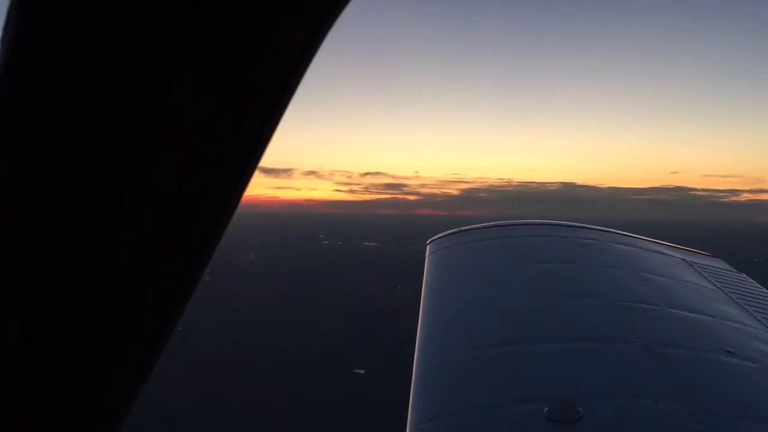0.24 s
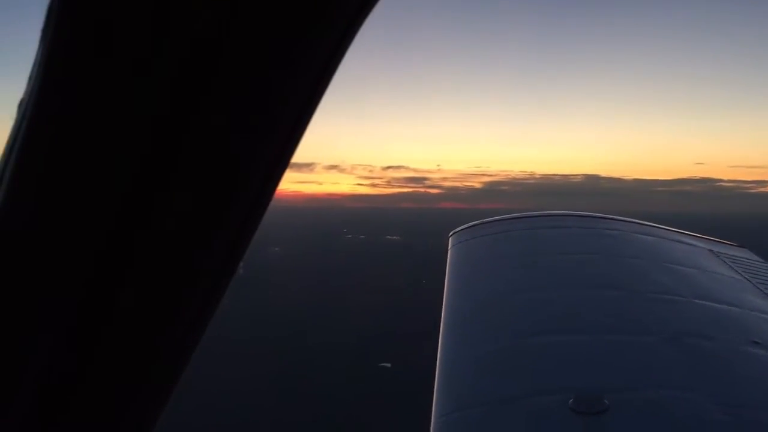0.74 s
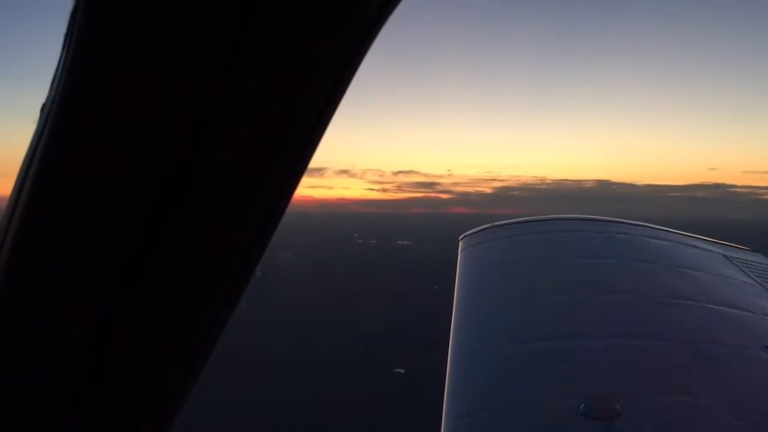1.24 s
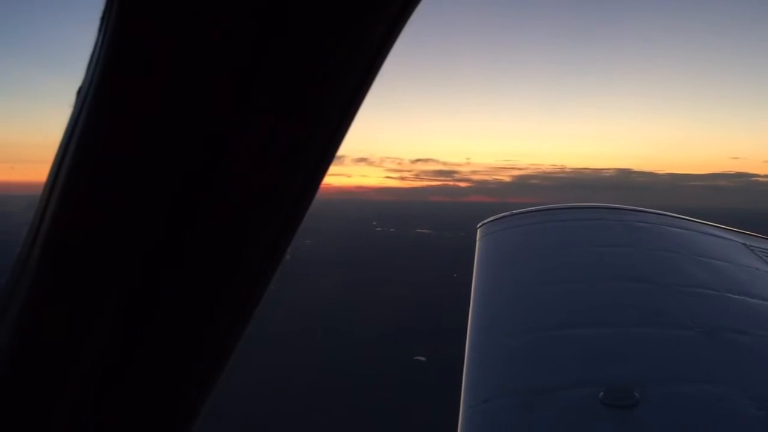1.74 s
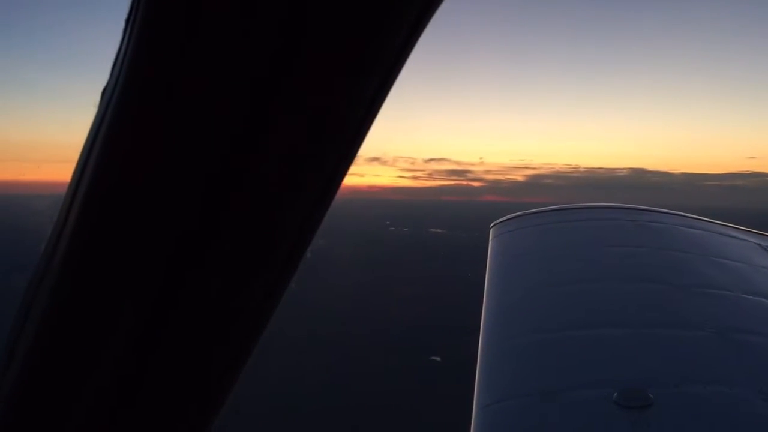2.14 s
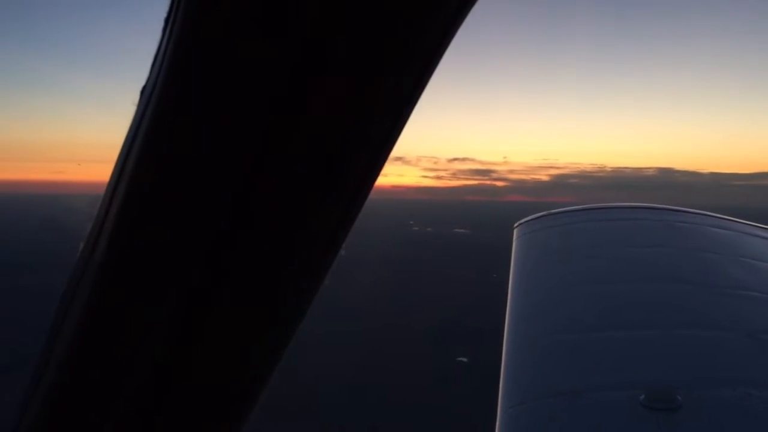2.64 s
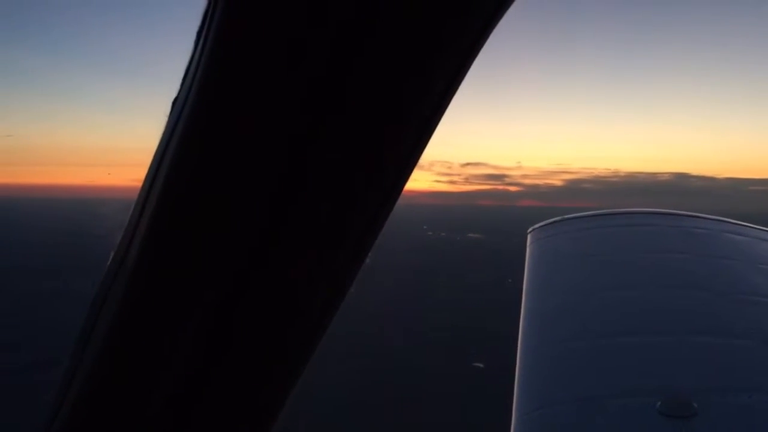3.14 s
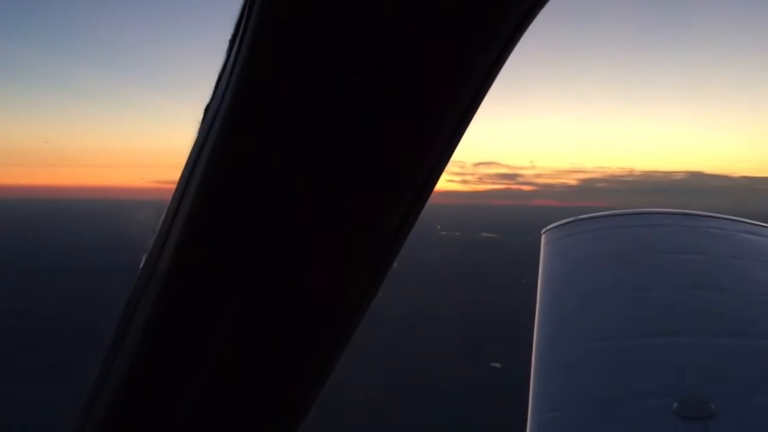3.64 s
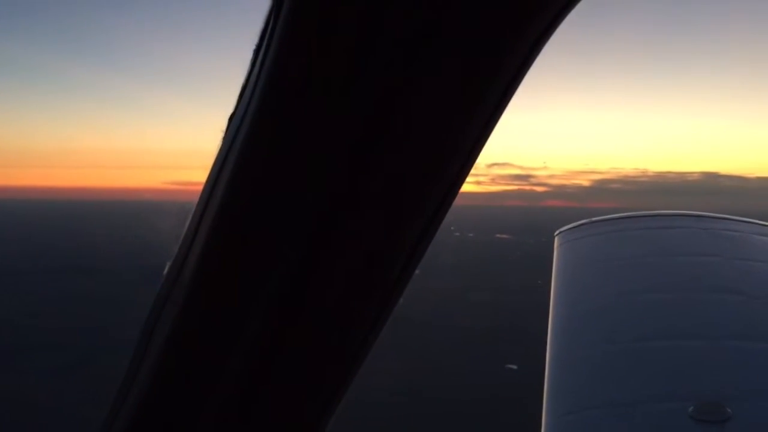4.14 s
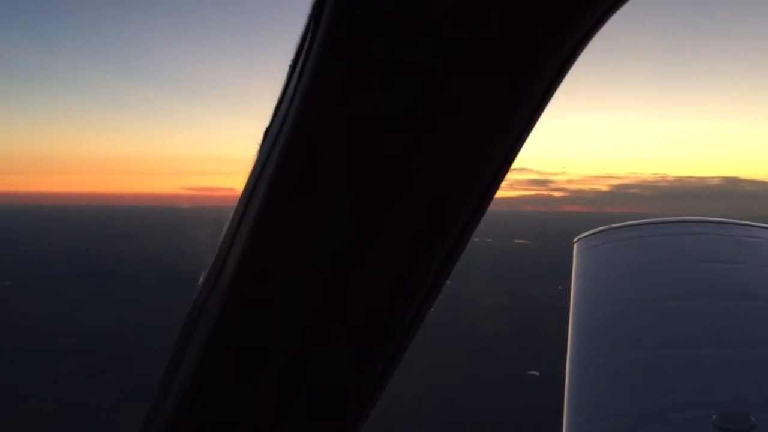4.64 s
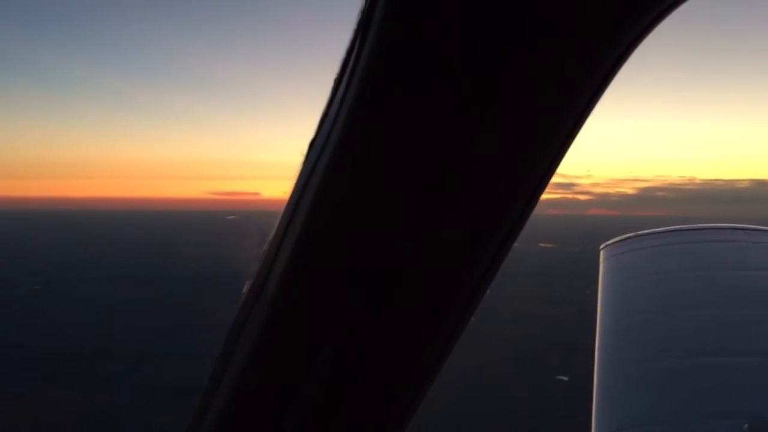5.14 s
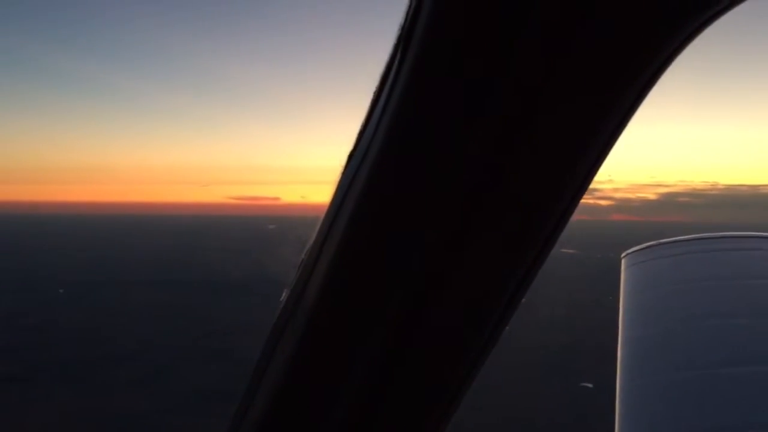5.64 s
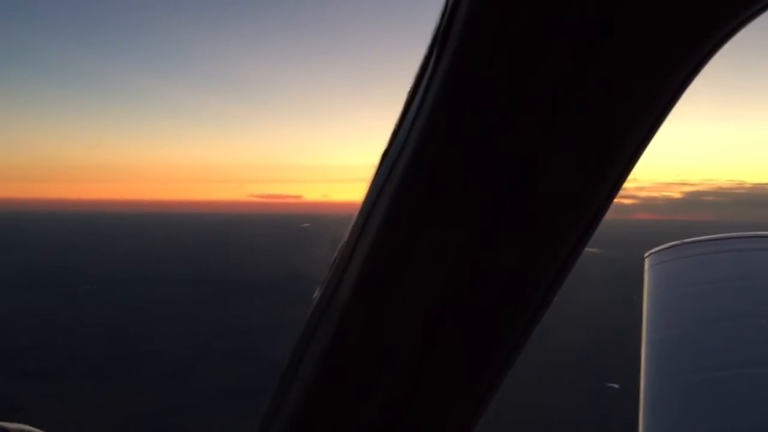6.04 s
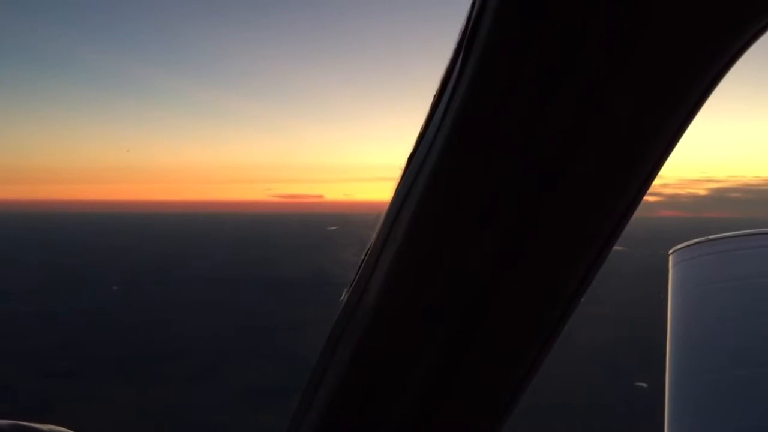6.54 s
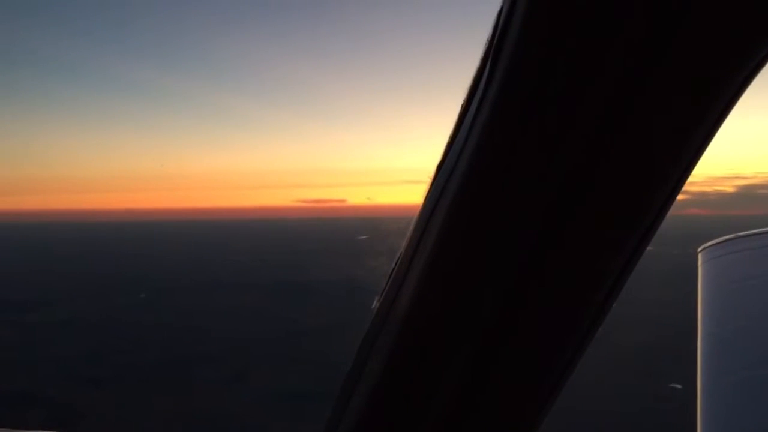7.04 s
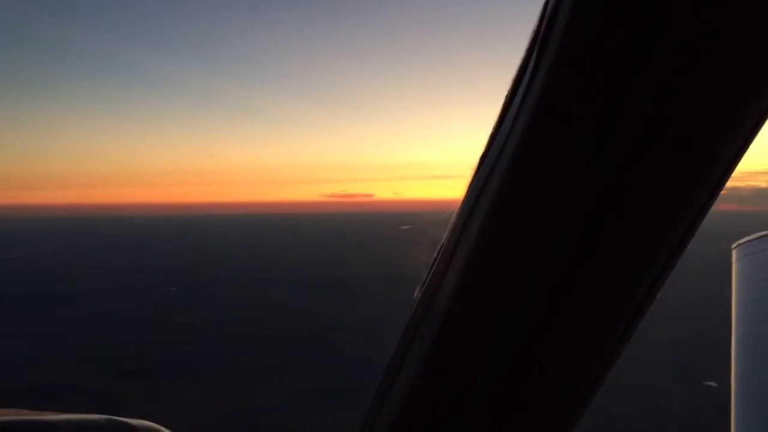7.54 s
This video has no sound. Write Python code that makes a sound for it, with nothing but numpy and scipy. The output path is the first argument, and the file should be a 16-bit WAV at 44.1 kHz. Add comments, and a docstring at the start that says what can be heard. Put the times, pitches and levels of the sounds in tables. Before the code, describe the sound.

Inside a small single-engine airplane in level flight, a deep steady engine and propeller drone hums loudly, with low cabin rumble and rushing air.

```python
"""A deep engine and propeller drone fills the cabin of a single-engine light airplane in level cruise.
It is built from sine tones at multiples of the crank speed, and a strong separate hum beats against them.
Shaped noise makes the rumble and boom of the cabin, a draught with a few puffs, and the rush of the slipstream.
The listener slowly turns from the wing towards the nose, which shifts the rush and some engine tones."""
import sys
import numpy as np
from scipy import signal
from scipy.fft import rfft, irfft
from scipy.io import wavfile

SR = 44100
rng = np.random.default_rng(int(sys.argv[2]) if len(sys.argv) > 2 else 0)


def digitize_waveform(pressure):
    """Quantize a signal to 16-bit integers and store it at the path in sys.argv[1].

    Rows of a 2-D input are taken as channels; values are limited to [-1, 1].
    """
    field = np.atleast_2d(pressure).T
    bounded = np.clip(field, -1, 1)
    quanta = np.round(bounded * 32767).astype(np.int16)
    wavfile.write(sys.argv[1], SR, quanta)


N = 343980   # length in samples, 7.8 s
TIME_S = np.arange(N) / SR


def from_db(db):
    """Turn decibels into a gain to multiply by."""
    return 10 ** (np.asarray(db) / 20)


def rms_one(x):
    """Scale to an average strength (rms) of 1."""
    return x / np.sqrt(np.mean(x ** 2) + 1e-20)


def in_time(rows):
    """Join the points of a table by straight lines: one value per sample for each column after the time."""
    point_s, *columns = np.transpose(rows)
    return [np.interp(TIME_S, point_s, column) for column in columns]


def drift(rate_hz):
    """Smooth random wandering of rms about 1, changing about `rate_hz` times a second."""
    step = 100            # samples between the random values
    settle = 1000         # first values, dropped while the smoothing filter settles
    pole = np.exp(-2 * np.pi * rate_hz * step / SR)
    white = rng.standard_normal(N // step + settle + 2)
    slow = signal.lfilter([1], [1, -2 * pole, pole * pole], white)[settle:]
    return np.interp(np.arange(N) / step, np.arange(len(slow)), rms_one(slow))


def bell(middle_s, length_s):
    """A smooth rise and fall of height 1; `length_s` either side of the middle it is down to 0.14."""
    return np.exp(-2 * ((TIME_S - middle_s) / length_s) ** 2)


def swells_db(rows):
    """Level change in dB from brief swells and dips."""
    return sum(change_db * bell(middle_s, length_s) for middle_s, change_db, length_s in rows)


def air_noise(colour, ripple_db=1.23):
    """Turbulent air: random noise given a colour, dying away 20 dB per octave beyond its ends; rms 1."""
    point_hz, point_db = np.transpose(colour)
    grid_hz = np.maximum(np.arange(N // 2 + 1) * SR / N, 1)
    octaves_outside = np.abs(np.log2(grid_hz / np.clip(grid_hz, point_hz[0], point_hz[-1])))
    level_db = np.interp(np.log(grid_hz), np.log(point_hz), point_db) - 20 * octaves_outside
    # echoes from the close walls comb the midrange; the upholstery soaks up the higher ones
    echo_delays_s = rng.uniform(0.00199, .009, size=6)
    combs = sum(np.cos(2 * np.pi * grid_hz * delay_s) for delay_s in echo_delays_s)
    comb_depth = np.interp(grid_hz, [0, 1300, 3500, 7000], [0, 1, 1, .4])
    level_db = level_db + ripple_db * comb_depth * rms_one(combs)
    spectrum = rfft(rng.standard_normal(N)) * from_db(level_db)
    return rms_one(irfft(spectrum, N))


def buffeted(colour, swing_db, rate_hz):
    """Air noise whose level swings at random, `rate_hz` times a second; rms 1."""
    return rms_one(from_db(swing_db * drift(rate_hz)) * air_noise(colour))


# colours of the rush past the windows, towards the wing and towards the nose, and of the hiss
# columns of all three: pitch_hz, relative_level_db (per Hz)
RUSH_WING_COLOUR = [(400, -21), (800, -5), (1030, -1), (1170, 4.5), (1450, -0.5), (1600, 0.5), (1720, 1),
                    (1870, -5.5), (2080, -3.5), (2400, -1.5), (2540, 1.5), (2800, -6), (2980, -9),
                    (4000, -38)]
RUSH_NOSE_COLOUR = [(400, -11.5), (800, -7), (1080, -4), (1280, -0.5), (1500, 1.5), (1650, -2),
                    (1830, -0.5), (2000, -5.5), (2150, -6), (2400, -4.5), (2580, -3), (2800, -5.5),
                    (2980, -15.5), (4000, -38)]
HISS_COLOUR = [(1500, -18.5), (3100, 0), (3800, 1), (4500, -1), (4920, -4), (5300, -0.6), (6800, -4),
               (8200, -8), (9700, -10), (10500, -14.5), (11100, -11.5), (13900, -12.5), (14500, -8.5),
               (15300, -15)]


def slipstream(turns, heading, wing_db=-33.0, nose_db=-34.5, hiss_db=-41.5, chop=0.036):
    """Steady rush and hiss of outside air, chopped a little by each pass of the two propeller blades."""
    blade_angle = 2 * 2 * np.pi * turns   # two blade passes in each turn
    blades = 1 + chop * (np.cos(blade_angle) + np.cos(2 * blade_angle))
    # the rush is loudest towards the wing, and the windows colour it differently in each direction
    wing_rush = np.sqrt(1 - heading) * from_db(wing_db) * air_noise(RUSH_WING_COLOUR)
    nose_rush = np.sqrt(heading) * from_db(nose_db) * air_noise(RUSH_NOSE_COLOUR)
    hiss = from_db(hiss_db) * air_noise(HISS_COLOUR)
    return blades * (wing_rush + nose_rush + hiss)


# strength of the draught before its trim; columns: start_s, level_db
GUSTS = [(0, -36), (1.3, -34.5), (1.8, -31), (2.25, -34), (2.9, -33.5), (3.6, -35.5), (4.7, -33.5),
         (5.15, -29.5), (5.8, -37), (6.6, -36), (7.1, -31.5), (7.8, -34.5)]
# colour of the draught; columns: pitch_hz, relative_level_db (per Hz)
DRAUGHT_COLOUR = [(200, -22), (320, -2.5), (440, -3.5), (490, -2.5), (540, 1.5), (620, 1.5), (720, -3),
                  (850, -7.5), (1050, -11), (1400, -15), (3000, -30)]


def draught(trim_db=-1.0, eddy_db=1.7, eddy_hz=11):
    """A draught in the cabin: noise that follows the gusts and wavers quickly at random."""
    gust_db, = in_time(GUSTS)
    level_db = gust_db + trim_db + eddy_db * drift(eddy_hz)
    return from_db(level_db) * air_noise(DRAUGHT_COLOUR)


# short puffs of the draught, level before their trim; columns: middle_s, level_db, length_s
PUFF_TIMES = [(1.732, -30.5, 0.018), (2.04, -31.5, 0.016), (2.872, -35, 0.034), (3.12, -32, .022),
              (3.228, -32.5, 0.028), (4.85, -33, 0.017), (4.956, -31, 0.025), (5.065, -33.5, 0.034),
              (5.196, -33.5, 0.052), (5.31, -33, 0.037)]
# colour of a puff; columns: pitch_hz, relative_level_db (per Hz)
PUFF_COLOUR = [(150, -5), (250, -1), (430, 6), (600, -3), (800, 1), (1050, -1), (1400, -21), (2500, -41)]


def puffs(trim_db=3.0):
    """Eddies of the draught brush past, each a soft swell of dull noise."""
    strength = sum(from_db(level_db + trim_db) * bell(middle_s, length_s)
                   for middle_s, level_db, length_s in PUFF_TIMES)
    return strength * air_noise(PUFF_COLOUR)


# slow changes in the buffeting, boom before its trim; columns: start_s, rumble_db, boom_db
BUFFET = [(0, -32, -28.8), (1.2, -34.5, -28), (1.75, -28.5, -26), (3.05, -33, -28.5), (3.6, -27.5, -28),
          (4.3, -27, -25.5), (5.8, -28.5, -28.5), (7.0, -32.5, -29.5), (7.8, -29, -30)]
# all the bass of the airframe sinks once, and the hum partly, during the strongest gust
# columns: middle_s, change_db, length_s
LULL = [(5.1, -6.5, .19)]
# colours of the deep rumble, the thrum and the boom; columns: pitch_hz, relative_level_db (per Hz)
RUMBLE_COLOUR = [(15, -25), (28, -21), (36, -21), (48, -4), (57, -0.5), (70, -2), (90, -14), (140, -44)]
THRUM_COLOUR = [(45, -36), (70, -14), (90, -4.5), (112, -4.5), (135, -9.5), (165, -10), (220, -25),
                (400, -38)]
BOOM_COLOUR = [(100, -37), (150, 2), (175, -0.5), (215, -1.5), (260, -6), (300, -7.5), (335, -20),
               (450, -30), (900, -48)]


def airframe(thrum_db=-24.5, boom_trim_db=-0.56):
    """Turbulence shakes the skin panels and the air they enclose, in three bands of low, uneven noise."""
    rumble_db, boom_db = in_time(BUFFET)
    rumble = from_db(rumble_db) * buffeted(RUMBLE_COLOUR, swing_db=2.0, rate_hz=5.0)
    thrum = from_db(thrum_db) * buffeted(THRUM_COLOUR, swing_db=2.0, rate_hz=5.3)
    boom = from_db(boom_db + boom_trim_db) * buffeted(BOOM_COLOUR, swing_db=1.2, rate_hz=5.2)
    return from_db(swells_db(LULL)) * (rumble + thrum + boom)


# pitch of the hum; columns: start_s, pitch_hz
HUM_PITCH = [(0, 135.0), (3, 135.05), (5, 135.25), (6.8, 135.5), (7.8, 135.1)]
# brief swells and dips of the hum, out of step with the engine; columns: middle_s, change_db, length_s
HUM_SWELLS = [(0.16, 2.5, 0.11), (1.34, -4, .06), (1.65, -3, .07), (2.05, 3.5, .12), (2.62, -6, .04),
              (4.2, -5, 0.073), (5.0, -6, .08), (5.47, 5.5, 0.067), (5.87, -9, 0.081)]


def hum(level_db=-20.0, octave_db=-25, waver_db=1.15, throb_db=1.4, throb_hz=3.7, slip_rad=0.31, lull_share=0.56):
    """A nearly pure tone, perhaps a belt-driven accessory, that throbs loosely and wavers in level and phase."""
    pitch_hz, = in_time(HUM_PITCH)
    throb = throb_db * np.sin(2 * np.pi * throb_hz * TIME_S + 2 * drift(0.47))
    changes_db = swells_db(HUM_SWELLS) + lull_share * swells_db(LULL)
    strength = from_db(level_db + throb + waver_db * drift(3.7) + changes_db)
    angle = 2 * np.pi * np.cumsum(pitch_hz) / SR + slip_rad * drift(1.5)
    tone = np.sin(angle) + from_db(octave_db) * np.sin(2 * angle)
    return strength * tone * np.sqrt(2)   # a sine times the root of 2 has rms 1


# engine and propeller tones at the seat, before drifts and facing
# columns: multiple_of_crank_speed, level_db
ENGINE_TONES = [(1, -47), (1.5, -46), (2, -31), (2.5, -31), (3, -35), (3.5, -37), (4, -27.5), (4.5, -36),
                (5, -45), (5.5, -39.5), (6, -34), (6.5, -43), (7, -42), (8, -46.5), (10, -47), (10.5, -54),
                (11.5, -57), (12, -53), (12.5, -55), (13, -45), (13.5, -45), (14, -42.5), (15, -48),
                (15.5, -53), (16, -48), (16.5, -48.5), (17.5, -47), (18, -50.5), (18.5, -55.5), (19, -57),
                (20, -52.5), (20.5, -54.5), (21.5, -56.5), (22, -56.5), (24, -56), (28, -57), (30, -57)]
# tones that are louder close to the side window; columns: multiple_of_crank_speed, gain_db
WINDOW_GAINS = [(6, 2), (8, 8)]
WINDOW_REACH = 0.14   # share of the heading scale over which the window gain in dB falls to 37 %


def engine(turns, heading, waver_db=1.24, sway_db=0.5, nose_db=3.5, shake_turns=0.0016):
    """A four-stroke cycle takes two turns, so unequal cylinders add tones at half multiples of crank speed."""
    # the engine's turning wanders slightly and slowly, about twice a second
    angle = 2 * np.pi * (turns + shake_turns * drift(2.1))
    window_gains = dict(WINDOW_GAINS)
    drone = np.zeros(N)
    for multiple, tone_db in ENGINE_TONES:
        # each tone's level wanders slowly at random, on its own
        level_db = tone_db + waver_db * drift(1.5) + sway_db * drift(0.28)
        level_db = level_db + window_gains.get(multiple, 0) * np.exp(-heading / WINDOW_REACH)
        if multiple > 10:
            level_db = level_db + nose_db * (heading - .5)   # short waves are louder facing the engine
        start_angle = 2 * np.pi * rng.random()
        drone += from_db(level_db) * np.sin(multiple * angle + start_angle)
    return drone * np.sqrt(2)


# speed of the crankshaft; columns: start_s, turns_per_s
CRANK_SPEED = [(0, 39.64), (.6, 39.67), (1.8, 39.68), (2.3, 39.76), (2.8, 39.67), (4.6, 39.65),
               (5.8, 39.67), (6.4, 39.70), (7.8, 39.65)]
# where the listener faces; columns: start_s, heading (0 wing to 1 nose, no unit)
HEADING = [(0, 0), (1.2, 0.089), (2.2, 0.43), (4.2, 0.6), (5.4, 0.86), (6.3, 0.91), (7.8, 1)]


def scene():
    """Everything as heard from one seat, sharing one crankshaft and one direction of facing."""
    turns_per_s, = in_time(CRANK_SPEED)
    turns = np.cumsum(turns_per_s) / SR
    heading = np.clip(in_time(HEADING)[0], 0, 1)
    air = slipstream(turns, heading) + draught() + puffs()
    return (air + airframe() + hum() + engine(turns, heading))[None]


def record(dry):
    """A steep low-pass filter removes the very top of the treble."""
    cutoff_hz = 15300
    # 12th order, 0.1 dB ripple below the cutoff, 90 dB down above it
    lowpass = signal.ellip(12, .1, 90, cutoff_hz, fs=SR, output="sos")
    return signal.sosfilt(lowpass, dry)


dry = scene()
out = record(dry)
digitize_waveform(out)
```